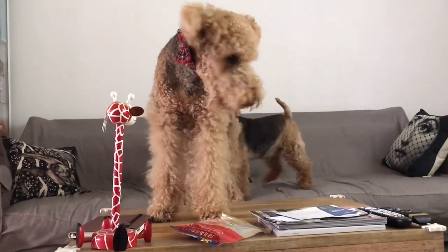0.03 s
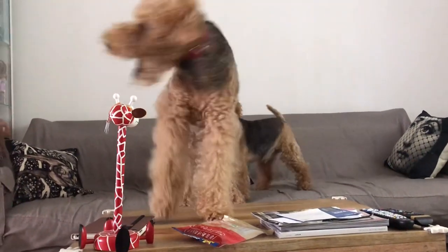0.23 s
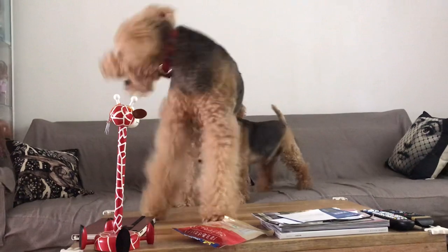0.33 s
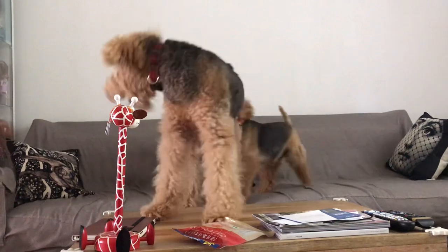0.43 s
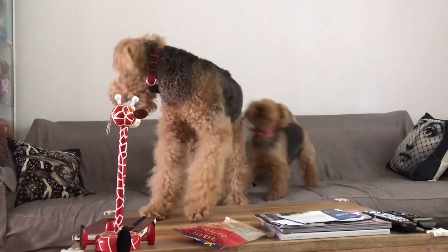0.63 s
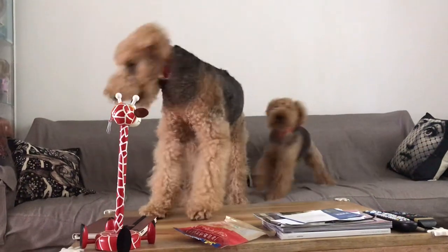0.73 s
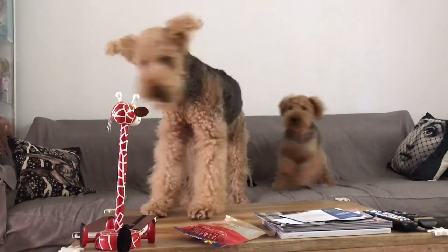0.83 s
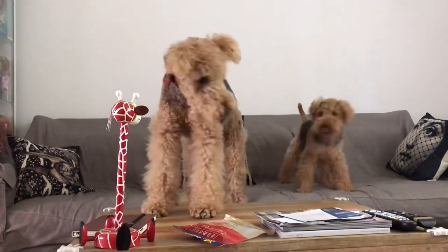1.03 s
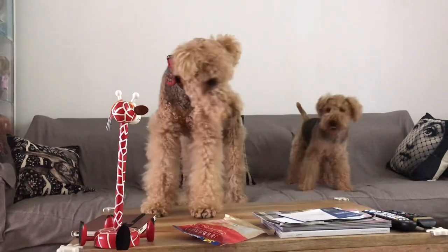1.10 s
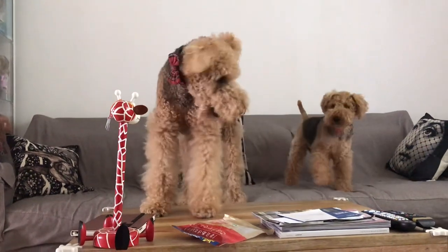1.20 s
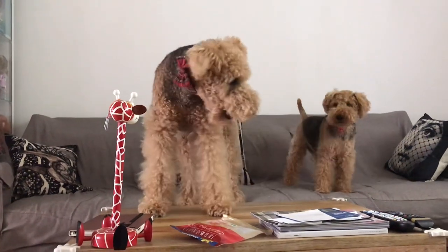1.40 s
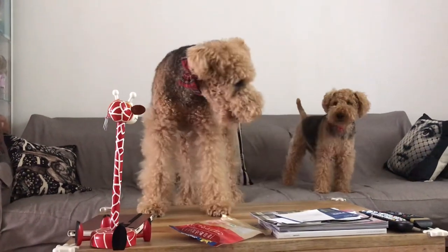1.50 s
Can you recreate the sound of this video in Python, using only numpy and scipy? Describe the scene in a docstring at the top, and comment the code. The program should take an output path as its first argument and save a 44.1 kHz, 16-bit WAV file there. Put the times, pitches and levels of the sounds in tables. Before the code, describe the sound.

A dog winds up from a growl into one loud bark, trails off in a falling whine, snorts and growls again. Its claws tick faintly on a wooden table in a briefly reverberant living room.

```python
"""A terrier winds up from a growl into one loud bark, trails off in a falling whine, snorts and growls again.
Its voice is a source and a filter: uneven pulses of the vocal folds excite the resonances of the throat
and open mouth, and a clear tone sounds at the heart of the bark. Its claws tick and a paw scuffs on a
wooden table. The living room reverberates briefly, and a limiter holds down the peaks of the bark."""
import sys
import numpy as np
from scipy import signal
from scipy.fft import rfft, irfft, next_fast_len
from scipy.io import wavfile
from scipy.ndimage import uniform_filter1d, minimum_filter1d

SR = 44100
rng = np.random.default_rng(int(sys.argv[2]) if len(sys.argv) > 2 else 0)


def put_to_file(sound):
    """Save the sound as 16-bit audio at rate SR, in the file named by the first command-line argument."""
    columns = np.atleast_2d(sound).T  # one column per channel
    safe = np.clip(columns, -1, 1)
    whole_steps = np.round(safe * 32767)
    wavfile.write(sys.argv[1], SR, whole_steps.astype(np.int16))


N = 68355
T = np.arange(N) / SR

# Vocal gestures (time [s], pitch [Hz], throat level [dB], mouth level [dB], roughness [0-1])
WIND_UP = [(.02, 68.2, -61.5, -91.5, 0.29), (.05, 73.3, -57, -84, 0.35), (.1, 94.3, -40.5, -63, 0.45),
           (.145, 114.4, -34, -56.5, 0.41), (.175, 190, -30, -60, 0.2), (.2, 206.6, -29, -45.5, 0.16),
           (.22, 229, -40, -54, 0.03)]
BARK_ONSET = [(.182, 181.6, -41, -40.5, 0.36), (.2, 206.7, -22, -21.5, 0.42), (.212, 255, -21, -22, 0.11),
              (.222, 319, -8, -9.5, 0.47), (.233, 315.2, -15, -14.5, 0.44),
              (.241, 309.4, -14.5, -10.5, 0.38), (.249, 310.7, -1.5, -24, 0.9),
              (.258, 305, -31, -40.5, 0.21)]
BARK = [(.24, 440, -41.5, -17, 0.68), (.253, 472.8, -27, -20.5, 0.44), (.27, 478.3, -11, -9, 0.28),
        (.29, 491.6, -20, -18, 0.59), (.315, 500.6, -10.5, -14.5, 0.86), (.335, 494, -24.5, -18, 1),
        (.365, 420.7, -21, -47.5, 0.72)]
WHINE = [(.465, 285.2, -40, -54, .1), (.487, 321.9, -23.5, -27, 0.036), (.508, 320.2, -17.5, -29.5, 0.068),
         (.523, 300, -36, -24, 0.11), (.55, 297.7, -21.5, -29, 0.31), (.575, 257.7, -29.5, -30.5, 0.48),
         (.6, 194, -42.5, -50, 0.22)]
GRUMBLE = [(.575, 207, -47.5, -65.5, 0.16), (.615, 179.9, -34.5, -34.5, 0.14),
           (.66, 169.9, -36, -44, 0.053), (.72, 167.5, -39, -81, .12), (.755, 135.8, -41.5, -52.5, 0.39),
           (.795, 125, -43.5, -54.5, 0.342), (.85, 88.6, -47.5, -53.5, 0.43), (.875, 81.4, -62, -56.5, .2)]
GROWL = [(1.305, 102.7, -38.5, -62, 0.043), (1.335, 115.1, -28.5, -49.5, 0.17),
         (1.365, 127.2, -28, -42.5, 0.33), (1.405, 125.6, -27.5, -41, 0.56),
         (1.43, 117.6, -29, -37.5, 0.73), (1.46, 118.7, -26.5, -36, 0.53), (1.49, 129.7, -33.5, -39, 0.89),
         (1.55, 123.2, -29, -42, 0.36)]
# Resonance curves of the throat (frequency [Hz], relative gain [dB])
WIND_UP_THROAT = [(30, -25), (70, 3.5), (170, -5), (230, -0.5), (350, -28), (520, -14), (680, -16.5),
                  (850, -27), (1200, -38.5), (4000, -80.5)]
ONSET_THROAT = [(30, -61), (100, -40.5), (210, -15), (320, -13.5), (430, -2), (600, 0), (760, -8), (950, 2),
                (1150, -8), (2000, -33), (6000, -73)]
BARK_THROAT = [(30, -70), (130, -44.5), (250, -9), (340, -29.5), (430, -12), (590, -18.5), (720, 8.5),
               (850, 3), (1060, 8), (1200, -26), (2000, -62), (6000, -79.5)]
WHINE_THROAT = [(120, -29), (300, -18), (420, -30.5), (560, -1.5), (640, 3.5), (760, -1.5), (930, -24),
                (1300, -20), (4000, -69.5)]
GRUMBLE_THROAT = [(30, -40), (85, 12), (170, 10.5), (260, 5.5), (390, -15.5), (520, -6), (660, -1.5),
                  (800, 6), (950, -45), (1200, -30), (4000, -77)]
GROWL_THROAT = [(50, -11.5), (115, -3.5), (180, 10.5), (250, 0), (380, -16), (520, -5.5), (620, 5),
                (720, 0.5), (820, -7.5), (1050, -28.5), (2000, -29.5), (6000, -54.5)]
# Resonance curves of the open mouth and the nose (frequency [Hz], relative gain [dB])
ONSET_MOUTH = [(300, -29.5), (900, -9.5), (1320, 9.5), (1540, -4), (1750, -17.5), (2100, -17.5),
               (2700, -29), (3300, -38), (4500, -46), (5650, -27), (6020, -23.5), (6400, -34), (7500, -47),
               (16000, -50)]
BARK_MOUTH = [(400, -40), (900, 4.5), (1350, 0.5), (1650, 3.5), (1900, -2), (2150, 0), (2400, -5.5),
              (2800, -9.5), (3250, -29), (4200, -29.5), (5400, -26), (6500, -26), (7500, -38.5),
              (12000, -46), (16000, -42.5)]
WHINE_MOUTH = [(400, -28), (900, 4), (1250, 3.5), (1600, -3.5), (1900, -11), (2350, -12.5), (3100, -42.5),
               (3900, -40.5), (4600, -32), (5100, -38.5), (6200, -27), (7800, -60.5), (9700, -40),
               (16000, -60.5)]
GROWL_MOUTH = [(400, -16), (1000, 6.5), (1350, 11), (1750, 6), (2100, -4), (2700, -16), (3200, -2),
               (4000, -20), (5000, -21), (6200, -8), (7800, -31), (10000, -31), (12200, -22.5),
               (16000, -43)]
NOSE = [(30, -18), (85, 10), (140, -8.5), (250, 2.5), (380, -10), (620, 1.5), (950, -6), (1350, -2.5),
        (1800, -3.5), (2600, -12), (3400, -29.5), (4300, -21.5), (5200, -28.5), (6100, -22), (7800, -37),
        (16000, -34)]
# Clear tone within the bark (time [s], pitch [Hz], fundamental level [dB], octave level [dB])
YELP = [(.243, 490, -27, -36), (.254, 474, -12, -7), (.268, 479, -12, -2), (.283, 486, -10, -8),
        (.3, 504, -9, -10), (.316, 502, -13, -11), (.326, 503, -27, -8), (.339, 504, -30, -7),
        (.351, 504, -40, -24)]
# Pressure pulses: throat catches in the growl, palate flaps in the snort (time [s], level [dB])
THROAT_CATCHES = [(1.39, -21), (1.4068, -17), (1.425, -21)]
PALATE_FLAPS = [(.9225, -27), (.936, -28), (.958, -30), (.966, -32), (.9718, -26)]
# Resonances that these pulses excite (frequency [Hz], bandwidth per stage [Hz], gain [dB])
CATCH_MODES = [(720, 290, 1), (1274, 200, -10.5), (1720, 150, -12), (3210, 170, -22)]
FLAP_MODES = [(610, 490, -1), (1268, 240, -2), (4240, 410, -21)]
# Noise envelopes: air through the nose, air through the teeth, a sliding paw (time [s], level [dB])
SNORT = [(.895, -50), (.92, -44), (.955, -40), (.98, -37.5), (1.02, -43.5), (1.07, -47), (1.15, -55.5),
         (1.23, -50), (1.3, -51.5)]
HISS = [(.17, -70), (.21, -50), (.232, -52), (.243, -32.5), (.26, -49.5), (.32, -51.5)]
SCUFF = [(.658, -70), (.666, -42), (.688, -49.5), (.705, -65), (.74, -51.5)]
# Claw impacts (time [s], energy level [dB], ring frequency [Hz], crack gain [dB])
CLAW_TICKS = [(0.109, -77.5, 4000, -2), (0.1334, -74, 4400, 3), (.9, -65.5, 4350, -12),
              (0.9697, -64, 4380, -25), (1.3451, -65, 5420, 0), (1.36, -80, 3930, -7)]
# Shifts of weight on the furniture (time [s], level [dB], frequency [Hz])
BUMPS = [(.925, -42.5, 84.4)]
# Spectra of hiss, scuff, claw crack, reverberation and background (frequency [Hz], relative gain [dB])
HISS_SPECTRUM = [(2000, -40), (4500, -9.5), (6100, 1), (8000, 2.5), (10000, 1.5), (12000, 6), (13500, 0),
                 (16000, -4.5)]
SCUFF_SPECTRUM = [(300, 4.5), (1500, 6), (3000, 1), (4500, -5.5), (6200, -8.5), (8000, -19), (12000, -27),
                  (16000, -19)]
CRACK_SPECTRUM = [(500, -2), (3500, -4.5), (7000, -5.5), (10000, -9), (13000, -15.5), (16000, -8.5)]
ROOM_SPECTRUM = [(50, -25), (200, 1), (600, 0), (1500, -0.5), (6000, 1.5), (16000, -3)]
BACKGROUND_SPECTRUM = [(25, -16), (45, -15), (85, 4.5), (150, 4.5), (240, 7.5), (400, -22), (1000, -16),
                       (3000, -21), (8000, -27.5), (16000, -33.5)]
# Standing waves of the room (frequency [Hz], time to decay by 60 dB [s], gain [dB])
ROOM_MODES = [(598, .4, -14), (1007, .5, -4)]


def voice(gesture, throat, mouth, mouth_air):
    """Source-filter principle: a blend of glottal pulses and air excites throat and mouth in parallel."""
    roughness = np.clip(curve(gesture, column=4), 0, 1)
    pulses, air = glottis(gesture[0][0], curve(gesture), roughness)

    def blend(air_share):
        """Uncorrelated signals add in power, so their squared weights sum to one."""
        return np.sqrt(1 - air_share ** 2) * pulses + air_share * air

    throat_source = blend(roughness) * envelope(gesture, column=2)
    mouth_source = blend(np.clip(roughness + mouth_air, 0, 1)) * envelope(gesture, column=3)
    return colour(throat_source, throat) + colour(mouth_source, mouth)


def glottis(start_s, pitch_hz, roughness, jitter=.1, shimmer_db=6.5, puff_cycles=0.61, steady_air=0.33):
    """The vocal folds chop airflow into pulses and noisy puffs; roughness scatters period and strength."""
    pulses, puffs = np.zeros(N), np.zeros(N)
    position = start_s * SR
    taps = np.arange(-8, 9)
    for period_draw, strength_draw in rng.standard_normal((256, 2)):
        i = int(position)
        if i + len(taps) >= N:
            break
        period = SR / pitch_hz[i] * np.exp(jitter * roughness[i] * period_draw)
        strength = undb(shimmer_db * roughness[i] * np.tanh(strength_draw))
        impulse = np.sinc(taps - position + i) * np.hanning(len(taps))  # falls between samples
        pulses[i + taps] += strength * np.sqrt(period) * impulse
        puffs[i:] = strength * np.exp(-np.arange(N - i) / (puff_cycles * period))
        position += period
    airflow = steady_air + (1 - steady_air) * puffs * np.sqrt(2 / puff_cycles)
    return pulses, airflow * rng.standard_normal(N)


def yelp(waver=.009):
    """Periodic vibration gives harmonics: the folds lock into a wavering tone with a strong octave."""
    wobble = uniform_filter1d(uniform_filter1d(rng.standard_normal(N), size=120), size=120)
    pitch_hz = curve(YELP) * (1 + waver * wobble / wobble.std())
    phase = 2 * np.pi * np.cumsum(pitch_hz) / SR
    fundamental = envelope(YELP, column=2) * np.sin(phase)
    octave = envelope(YELP, column=3) * np.sin(2 * phase)
    return np.sqrt(2) * (fundamental + octave)


def airway_knocks(events, modes):
    """Impulse response: single pressure pulses ring a few heavily damped resonances of the airway."""
    pulses = np.zeros(N)
    for time_s, db in events:
        pulses[int(time_s * SR)] += undb(db) * SR * np.e / (2 * np.pi)
    return sum(undb(db) / width * ring_twice(pulses, hz, width) for hz, width, db in modes)


def snort():
    """Turbulent air is filtered by the nasal cavity while the soft palate flaps a few times."""
    return shaped_noise(SNORT, NOSE) + airway_knocks(PALATE_FLAPS, FLAP_MODES)


def teeth_hiss():
    """Turbulence at a narrow gap: air hisses through the teeth as the jaws open."""
    return shaped_noise(HISS, HISS_SPECTRUM)


def claws(decay_s=.002, width_hz=800):
    """Impact excitation: each claw gives a short broadband crack and a bright, damped ring."""
    ticks = np.zeros(N)
    for time_s, db, hz, crack_db in CLAW_TICKS:
        burst = rng.standard_normal(N) * (T >= time_s) * np.exp(-np.abs(T - time_s) / decay_s)
        burst *= undb(db) * np.sqrt(SR / np.sum(burst ** 2))  # 0 dB: energy of 1 s at unit level
        ticks += 2 * ring_twice(burst, hz, width_hz) + undb(crack_db) * colour(burst, CRACK_SPECTRUM)
    return ticks


def furniture_bump(rise_s=0.0051, decay_s=0.086):
    """Damped oscillation: the furniture answers a shift of weight with a low swing."""
    swing = np.zeros(N)
    for time_s, db, hz in BUMPS:
        age = np.maximum(T - time_s, 0)
        amplitude = undb(db) * np.sqrt(2) * (1 - np.exp(-age / rise_s)) * np.exp(-age / decay_s)
        swing += amplitude * np.sin(2 * np.pi * hz * age)
    return swing


def paw_scuff():
    """Sliding friction between paw and table top makes a brief noise."""
    return shaped_noise(SCUFF, SCUFF_SPECTRUM)


def room_modes(sound):
    """Standing waves ring on after the voice; the longer the decay, the narrower the resonance."""
    return sum(undb(db) * ring(sound, hz, np.log(1000) / np.pi / t60) for hz, t60, db in ROOM_MODES)


def reverberation(sound, low_t60_s=0.54, high_t60_s=0.47, crossover_hz=3500, build_s=0.007):
    """Diffuse reflections build quickly, then decay exponentially, sooner in the treble."""
    noise = rng.standard_normal(N)
    low = signal.sosfilt(signal.butter(2, crossover_hz, fs=SR, output="sos"), noise)
    tail = low * undb(-60 * T / low_t60_s) + (noise - low) * undb(-60 * T / high_t60_s)
    tail *= 1 - np.exp(-(T / build_s) ** 2)
    size = 2 * next_fast_len(N)
    transfer = rfft(tail / np.linalg.norm(tail), size) * bin_gains(ROOM_SPECTRUM, size)
    return irfft(rfft(sound, size) * transfer)[:N]


def background(level_db=-56):
    """Stationary noise, strongest in the bass, is heard as a quiet rumble."""
    return undb(level_db) * colour(rng.standard_normal(N), BACKGROUND_SPECTRUM)


def undb(db):
    """Amplitude grows tenfold for every 20 dB."""
    return 10 ** (np.asarray(db) / 20)


def curve(rows, column=1):
    """Linear interpolation joins the values of one column in time."""
    rows = np.array(rows)
    return np.interp(T, rows[:, 0], rows[:, column])


def envelope(rows, column=1, fade_s=0.011):
    """Amplitude follows a dB column, with a Gaussian fade beyond either end."""
    outside_s = np.maximum(rows[0][0] - T, 0) + np.maximum(T - rows[-1][0], 0)
    return undb(curve(rows, column)) * np.exp(-(outside_s / fade_s) ** 2)


def bin_gains(spectrum, size):
    """Interpolation in log frequency gives a gain for each bin of a Fourier transform."""
    hz, db = np.array(spectrum).T
    bin_hz = np.arange(size // 2 + 1) * SR / size
    return undb(np.interp(np.log(bin_hz + 1), np.log(hz), db))


def colour(sound, spectrum, size=4096):
    """Minimum-phase filtering: folding the cepstrum gives a causal response, scaled to unit energy."""
    cepstrum = irfft(np.log(bin_gains(spectrum, size)))
    cepstrum[1:size // 2] *= 2
    cepstrum[size // 2 + 1:] = 0
    response = irfft(np.exp(rfft(cepstrum)))
    return signal.fftconvolve(sound, response / np.linalg.norm(response))[:N]


def shaped_noise(levels, spectrum):
    """Subtractive synthesis: white noise is shaped in time, then in frequency."""
    return colour(envelope(levels) * rng.standard_normal(N), spectrum)


def ring(sound, hz, width_hz):
    """A second-order resonator has unit gain at its centre frequency."""
    return signal.lfilter(*signal.iirpeak(hz, hz / width_hz, fs=SR), sound)


def ring_twice(sound, hz, width_hz):
    """Two equal resonator stages in cascade give a peak with steeper sides."""
    return ring(ring(sound, hz, width_hz), hz, width_hz)


def scene(dog_send_db=-7, yelp_send_db=-13, paw_send_db=-0.5):
    """Superposition: the direct sound of the dog and its paws adds to the room's response and background."""
    dog = (voice(WIND_UP, WIND_UP_THROAT, ONSET_MOUTH, mouth_air=0.27)
           + voice(BARK_ONSET, ONSET_THROAT, ONSET_MOUTH, mouth_air=0.3)
           + voice(BARK, BARK_THROAT, BARK_MOUTH, mouth_air=0.11)
           + voice(WHINE, WHINE_THROAT, WHINE_MOUTH, mouth_air=0.4)
           + voice(GRUMBLE, GRUMBLE_THROAT, WHINE_MOUTH, mouth_air=0.4)
           + voice(GROWL, GROWL_THROAT, GROWL_MOUTH, mouth_air=0.87)
           + airway_knocks(THROAT_CATCHES, CATCH_MODES) + snort() + teeth_hiss())
    tone = yelp()
    paws = claws() + furniture_bump() + paw_scuff()
    room_send = undb(dog_send_db) * dog + undb(yelp_send_db) * tone + undb(paw_send_db) * paws
    room = room_modes(dog + tone) + reverberation(room_send)
    return (dog + tone + paws + room + background())[None]


def record(dry, ceiling=1, hold_s=.005, cutoff_hz=15700):
    """Peak limiting: the gain dips around peaks above the ceiling; a low-pass then cuts the top treble."""
    window = int(hold_s * SR)
    needed_gain = ceiling / np.maximum(np.abs(dry), ceiling)
    smooth_gain = uniform_filter1d(minimum_filter1d(needed_gain, window), window)
    lowpass = signal.ellip(10, .2, 80, cutoff_hz, fs=SR, output="sos")
    return signal.sosfilt(lowpass, dry * smooth_gain)


dry = scene()
out = record(dry)
put_to_file(out)
```